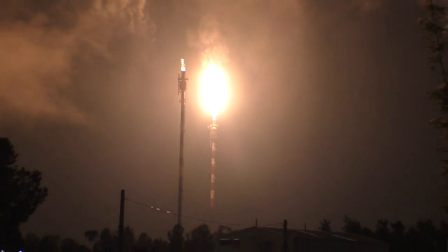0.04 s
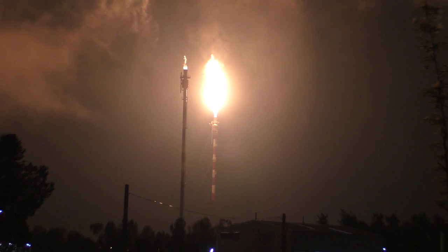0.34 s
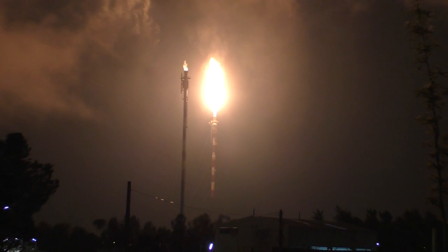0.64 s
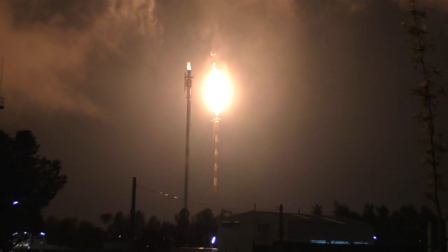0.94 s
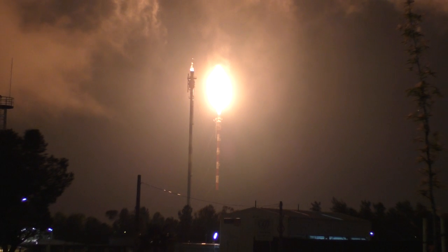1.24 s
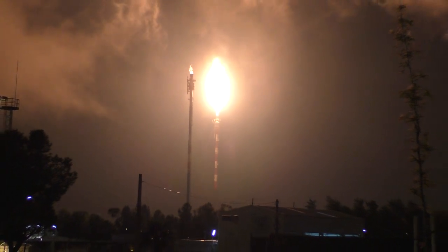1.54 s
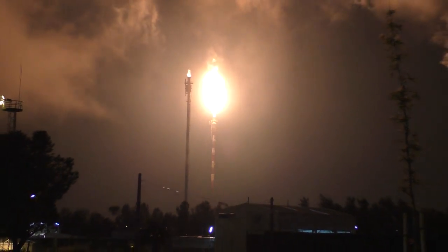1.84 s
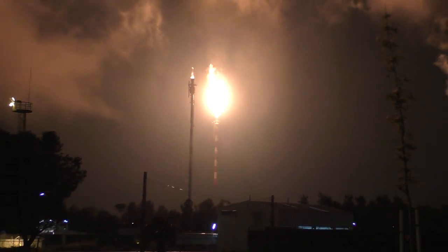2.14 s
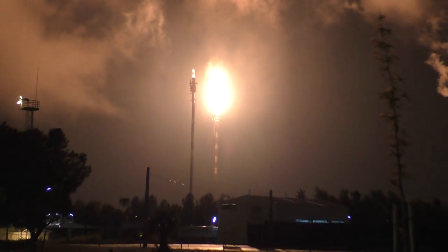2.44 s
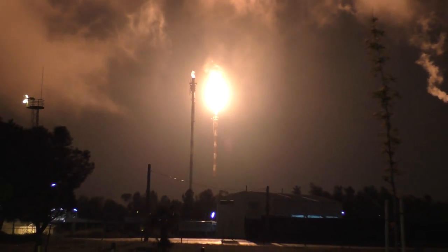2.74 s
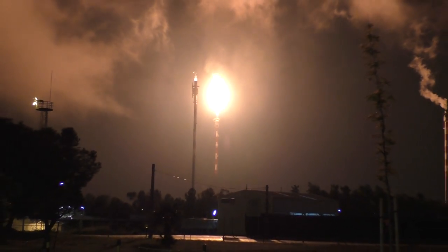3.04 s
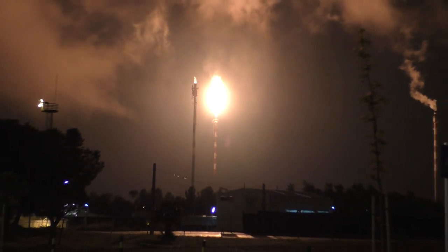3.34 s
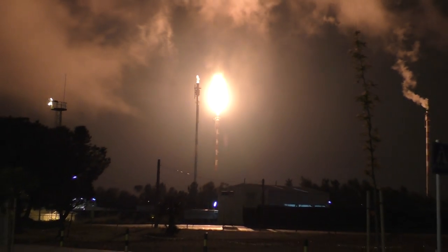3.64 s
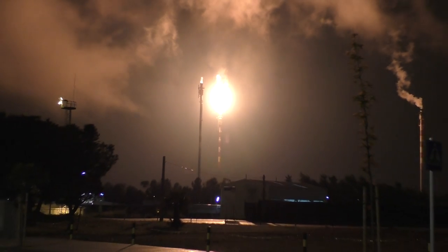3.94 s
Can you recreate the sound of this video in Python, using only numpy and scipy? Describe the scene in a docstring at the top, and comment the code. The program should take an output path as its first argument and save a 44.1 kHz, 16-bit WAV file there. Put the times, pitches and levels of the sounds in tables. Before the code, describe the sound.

A distant gas flare roars low and steady for all four seconds, with a heaving rumble and flutter. Brief, heavier puffs of flame come near 0.8 seconds and between 2.3 and 2.8, the strongest at 2.5. Above the roar, quieter steam rushes and hisses, swelling and fading in the night air, with a hollow edge around 0.6 and 1.8 seconds. The sound is mono with little treble.

```python
"""A big refinery gas flare, burning far off at night: turbulent combustion gives a steady low roar
over a heaving rumble. The steam jets at its tip rush and hiss, and on the long way through moving air
bands of the hiss swell and fade. Taken in mono on a camera microphone, with little treble and a
limiter that ducks on the heaviest surges."""
import sys
import numpy as np
from scipy import signal
from scipy.fft import rfft, irfft, next_fast_len
from scipy.io import wavfile
from scipy.ndimage import uniform_filter1d, minimum_filter1d, map_coordinates

SR = 44100
rng = np.random.default_rng(int(sys.argv[2]) if len(sys.argv) > 2 else 0)


def output_pcm(signal):
    """Save a mono or channel-first signal as 16-bit PCM at the path in sys.argv[1].

    Samples are clipped to [-1, 1] before scaling.
    """
    pcm = np.clip(np.atleast_2d(signal).T, -1, 1) * 32767
    wavfile.write(sys.argv[1], SR, np.round(pcm).astype(np.int16))


N = 176400


def flame():
    """Burning eddies: the largest rumble, middling ones roar, small ones flutter; puffs swell the bass."""
    # loudness of each size of eddy, before its trim: time_s, level_db
    rumble_level = [(0,-12.5),(.08,-23.5),(.35,-22.5),(.44,-18.5),(.53,-21.5),(.84,-20.5),(1.1,-18.5),(1.3,-19),(1.63,-21.5),(1.85,-19),(2.35,-23),(2.55,-14.5),(2.72,-17.5),(3.05,-25),(3.3,-19.5),(3.74,-21.5),(3.87,-21),(4,-18)]
    roar_level = [(0,-14.5),(.17,-23.5),(.42,-19.5),(.8,-16),(1.08,-19),(1.38,-15.5),(1.6,-21.5),(1.76,-15),(2.18,-19.5),(2.5,-14.5),(2.7,-16),(3,-17.5),(3.23,-18.5),(3.35,-17),(4,-15.5)]
    flutter_level = [(0,-27.5),(.4,-25.5),(.76,-22.5),(1,-21),(1.38,-28),(1.7,-25),(2.25,-22),(2.48,-22.5),(2.66,-25),(2.85,-24.5),(3.15,-23.5),(3.53,-21),(4,-23)]
    # their spectra at the microphone: frequency_hz, relative_db
    rumble_spectrum = [(10,-7.5),(20,-15.5),(30,-9),(39,1),(55,1),(68,1),(85,0),(105,-6.5),(150,-30.5),(300,-94)]
    roar_spectrum = [(50,-36),(80,-11.5),(98,-2),(115,-1.5),(131,1),(155,-1),(178,-7),(205,-15.5),(280,-40),(500,-91)]
    flutter_spectrum = [(120,-44),(165,-8),(195,0),(235,-2.5),(270,0),(310,-5),(350,-6.5),(395,-16),(520,-26.5),(900,-103.5)]
    # heavy puffs of the flame: middle_s, rise_db
    puffs = [(.76,5.5),(0.859,8.5),(1.166,5.5),(1.509,4.5),(2.295,7.5),(2.505,11),(2.769,8),(3.335,3.5),(3.735,4.5)]
    puff_db = sum(rise_db * bell(middle_s, half_length_s=.0098) for middle_s, rise_db in puffs)
    rumble = envelope(rumble_level, trim_db=.5) * steadied(turbulence(rumble_spectrum), span_s=.14)
    roar = envelope(roar_level, trim_db=-.5) * steadied(turbulence(roar_spectrum), span_s=.15)
    flutter = envelope(flutter_level, trim_db=-.5) * steadied(turbulence(flutter_spectrum), span_s=.18)
    return amp(puff_db) * (rumble + roar) + flutter


def steam_jets():
    """Steam at the flare's tip: a broad rush, a hollow peak, hiss and fizz, all slightly unsteady."""
    # loudness of each part of the steam, before any trim: time_s, level_db
    rush_level = [(0,-37.5),(.35,-33.5),(.65,-30),(1.25,-35.5),(1.86,-32),(2.05,-33.5),(2.78,-35.5),(3.25,-30.5),(3.75,-32),(4,-32.5)]
    hollow_level = [(0,-32.5),(.28,-29.5),(.56,-23.5),(.77,-25.5),(.88,-30),(1.5,-32),(1.79,-24.5),(2,-33.5),(2.13,-29.5),(2.5,-39.5),(2.8,-42.5),(3.5,-43),(4,-44.5)]
    hiss_level = [(0,-39),(.25,-37.5),(.65,-33),(1.05,-34.5),(1.5,-36.5),(1.9,-33.5),(2.3,-32.5),(2.7,-32.5),(3.1,-33.5),(3.4,-32.5),(3.9,-31)]
    fizz_level = [(0.0, -51), (0.03, -56), (0.78, -46.5), (1.55, -52), (2.03, -49.5), (2.23, -46),
                  (2.24, -49), (2.56, -49), (3.04, -47), (3.06, -51.5), (4.0, -44.5)]
    # their spectra at the microphone: frequency_hz, relative_db
    rush_spectrum = [(200,-30),(380,-4),(480,2),(580,-1),(720,-1),(860,-5.5),(1050,-4),(1400,-7),(2000,-11),(3500,-61.5)]
    hollow_spectrum = [(700,-45.5),(1030,-3.5),(1220,8.5),(1310,8),(1430,10.5),(1540,5.5),(1700,-4),(2400,-65)]
    hiss_spectrum = [(900,-29),(1500,-4.5),(1850,-1.5),(2200,0.3),(2750,-1),(3100,-2.5),(3300,-2.5),(4000,-7),(4450,-9.5),(4900,-26),(5800,-45.5),(8000,-89.5)]
    fizz_spectrum = [(3000,-29.5),(4300,-4),(4800,-1.5),(5450,-7),(6000,-12.5),(6500,-20.5),(7000,-30.5),(7600,-36),(8500,-49),(15000,-57.5)]
    rush = envelope(rush_level, trim_db=.5) * turbulence(rush_spectrum)
    hollow = envelope(hollow_level, trim_db=-.5) * turbulence(hollow_spectrum)
    hiss = envelope(hiss_level) * turbulence(hiss_spectrum)
    fizz = envelope(fizz_level, trim_db=.5) * turbulence(fizz_spectrum)
    flicker_db = .4 * wobble(rate_hz=14)
    return (rush + hollow + hiss + fizz) * amp(flicker_db)


def moving_air():
    """Moving air between flare and microphone: narrow bands of noise swell, slide a little and fade."""
    # swelling bands: middle_s, half_length_s, centre_hz, drift_hz_per_s, half_width_hz, peak_db
    swells = [(.58,0.22,4260,199.5,200,-43),(0.628,0.42,860,30,54,-39),(.72,0.34,3580,450,229.9,-36.5),(0.695,0.1,5600,0,189.7,-54.5),
              (0.955,0.54,2841,-0.5,110.1,-39),(1.38,0.15,2438,-1,220,-35.5),(1.747,0.36,2680,-150,179.3,-40),(1.796,.14,472,0,29.7,-37),(2.3,.4,3980,0,240,-42),
              (2.193,0.083,5030,0,111,-48),(2.254,0.16,2706,0,190.7,-32.5),(3.08,.22,4430,-300,169.3,-43),(3.203,0.94,1117,0,75.1,-41),(3.301,0.65,5380,-250,220.6,-53),
              (3.498,0.47,1880,-100,140,-39),(3.603,0.16,185,0,27.74,-22.5),(3.75,0.32,1447,0,46.1,-38),(3.85,0.24,2780,0,159.3,-38.5),(3.9,0.37,3383,-60,124.4,-36.5)]
    t, bands = np.arange(N) / SR, np.zeros(N)
    for middle_s, half_length_s, centre_hz, drift_hz_per_s, half_width_hz, peak_db in swells:
        white = rng.standard_normal((2, N))
        slow_noise = unit(filtered(white, lambda hz: 1 / (1 + (hz / half_width_hz) ** 2 / 2) ** 2))
        wander_hz = .25 * half_width_hz * wobble(rate_hz=5)
        pitch_hz = centre_hz + drift_hz_per_s * (t - middle_s) + wander_hz
        phase = 2 * np.pi * np.cumsum(pitch_hz) / SR
        band = slow_noise[0] * np.cos(phase) + slow_noise[1] * np.sin(phase)  # shifted up to pitch_hz
        bands += amp(peak_db) * bell(middle_s, half_length_s) * band
    return bands


def amp(db):
    """Decibels to gain."""
    return 10 ** (np.asarray(db) / 20)


def unit(x):
    """Scale to rms 1."""
    return x / np.sqrt(np.mean(x ** 2) + 1e-20)


def envelope(levels, trim_db=0):
    """Rows of time_s, level_db as one gain per sample."""
    return amp(trim_db + np.interp(np.arange(N) / SR, *np.transpose(levels)))


def bell(middle_s, half_length_s):
    """A Gaussian rise and fall of height 1."""
    return np.exp(-.5 * ((np.arange(N) / SR - middle_s) / half_length_s) ** 2)


def wobble(rate_hz):
    """A smooth curve through rate_hz random knots a second."""
    knots = rng.standard_normal(int(N * rate_hz / SR) + 4)
    return map_coordinates(knots, [np.arange(N) * rate_hz / SR])


def filtered(x, response):
    """Shape x by a gain that depends on frequency."""
    size = next_fast_len(N + 8192)
    return irfft(rfft(x, size) * response(np.fft.rfftfreq(size, 1 / SR)), size)[..., :N]


def turbulence(spectrum):
    """Noise of rms 1, coloured by rows of frequency_hz, relative_db."""
    knots_hz, db = np.transpose(spectrum)
    white = rng.standard_normal(N)
    return unit(filtered(white, lambda hz: amp(np.interp(np.log(hz + 1), np.log(knots_hz + 1), db))))


def steadied(noise, span_s):
    """Even out the slow swings of a noise and keep its quick flutter."""
    power = np.abs(uniform_filter1d(noise ** 2, int(span_s * SR)))
    return unit(noise / np.sqrt(uniform_filter1d(power, SR // 50) + 1e-6))


def scene():
    """Flame and steam from far across the night air, in mono."""
    fade_in = np.minimum(1, np.arange(N) / 128)
    return (fade_in * (flame() + steam_jets() + moving_air()))[None]


def record(dry):
    """The camera microphone: its limiter ducks on big peaks and recovers fast; the top treble is cut."""
    ceiling_db, attack_s, release_db_per_s, top_hz = -3, .0046, 72.5, 15700
    attack = int(attack_s * SR)
    needed_db = np.minimum(0, ceiling_db - 20 * np.log10(np.abs(dry) + 1e-9))
    ducked_db = minimum_filter1d(needed_db, attack)
    recovery_db = release_db_per_s * np.arange(N) / SR
    held_db = np.minimum.accumulate(ducked_db - recovery_db, axis=-1) + recovery_db
    smooth_db = uniform_filter1d(uniform_filter1d(held_db, attack), attack)
    lowpass = signal.butter(12, top_hz, fs=SR, output="sos")
    return signal.sosfiltfilt(lowpass, dry * amp(smooth_db))


dry = scene()
out = record(dry)
output_pcm(out)
```